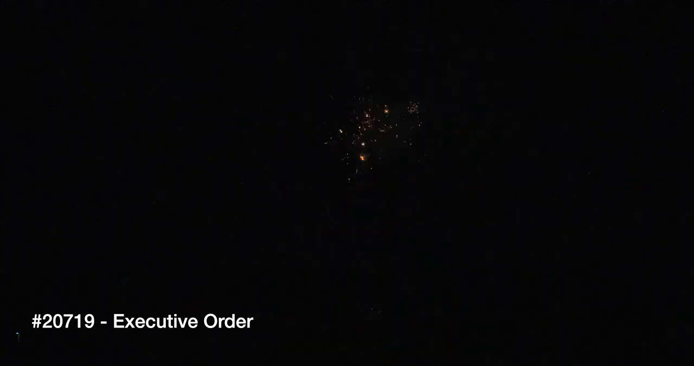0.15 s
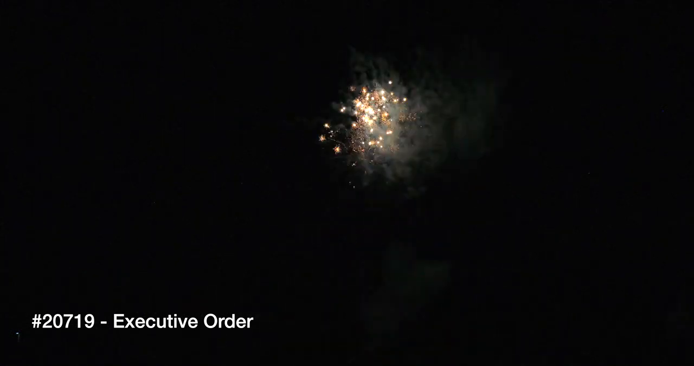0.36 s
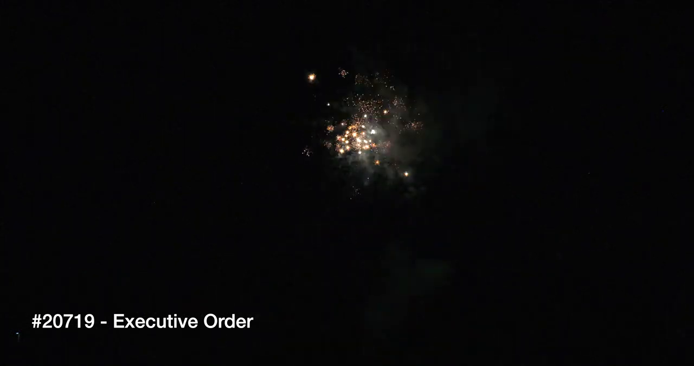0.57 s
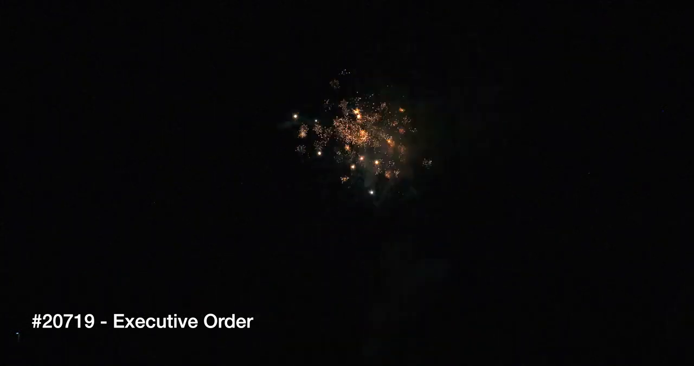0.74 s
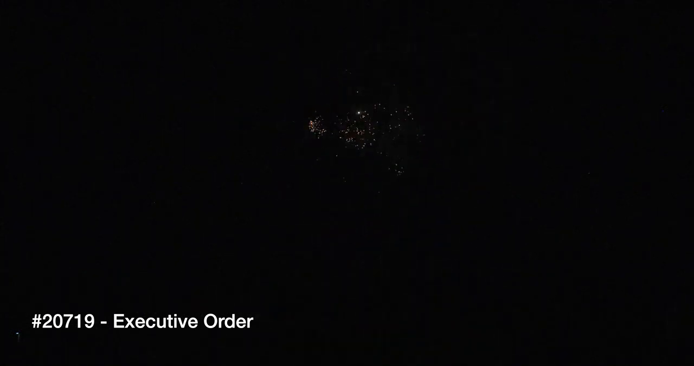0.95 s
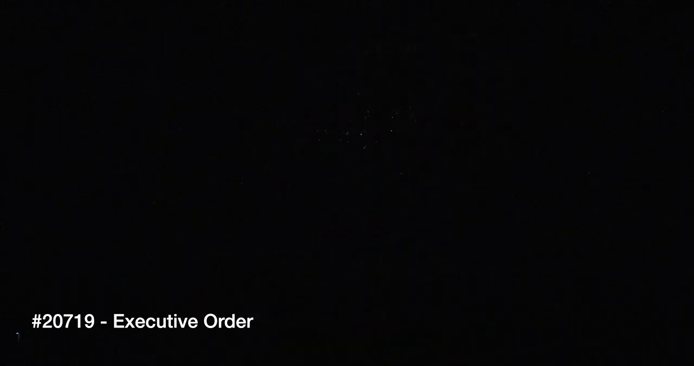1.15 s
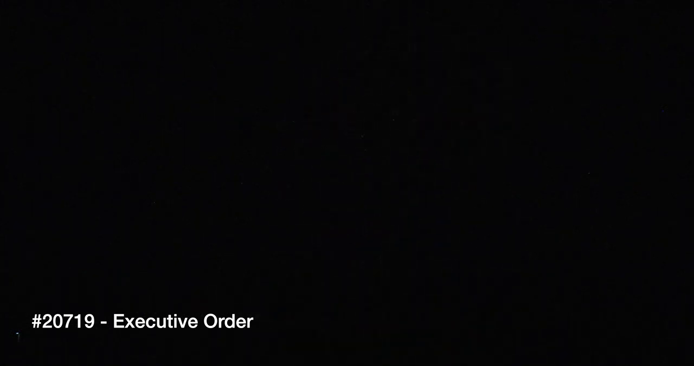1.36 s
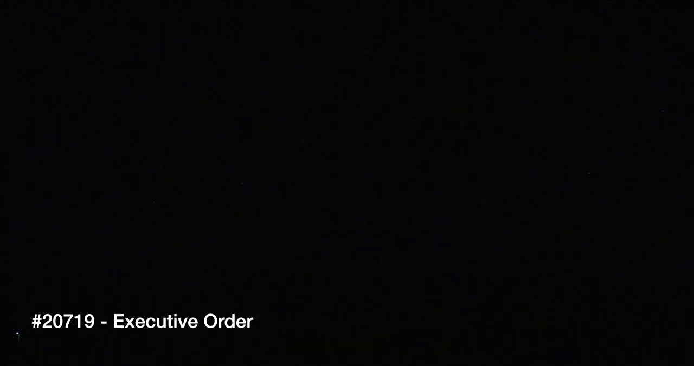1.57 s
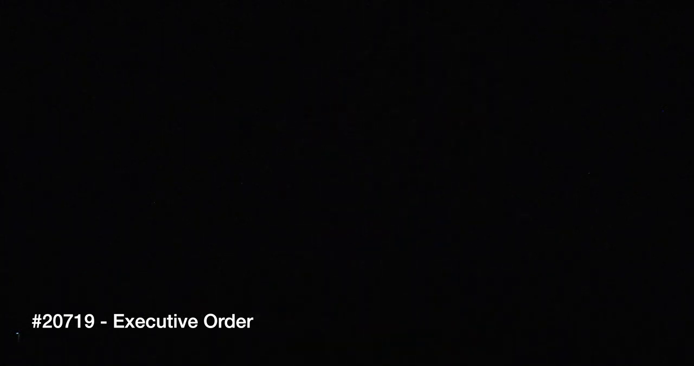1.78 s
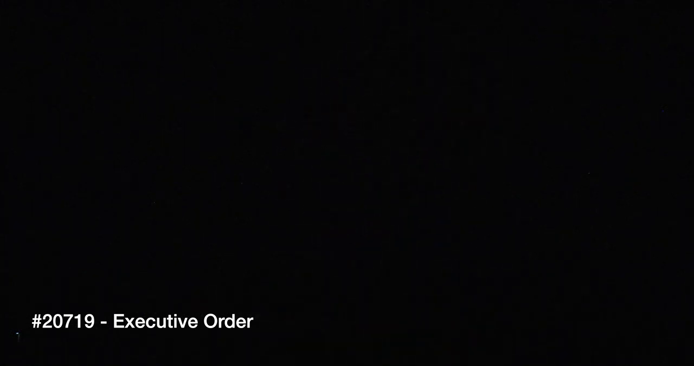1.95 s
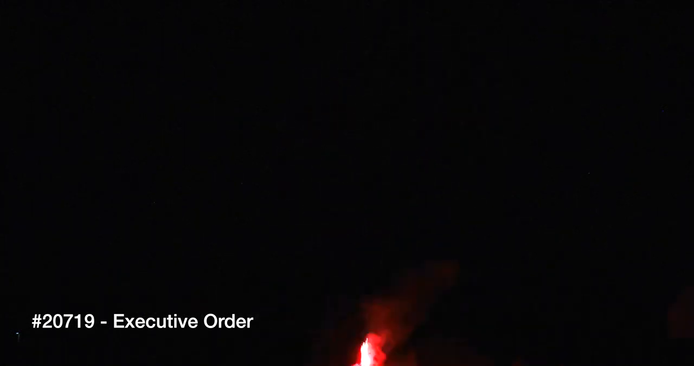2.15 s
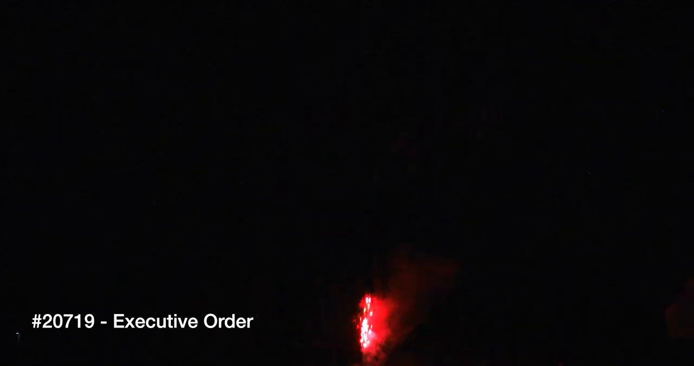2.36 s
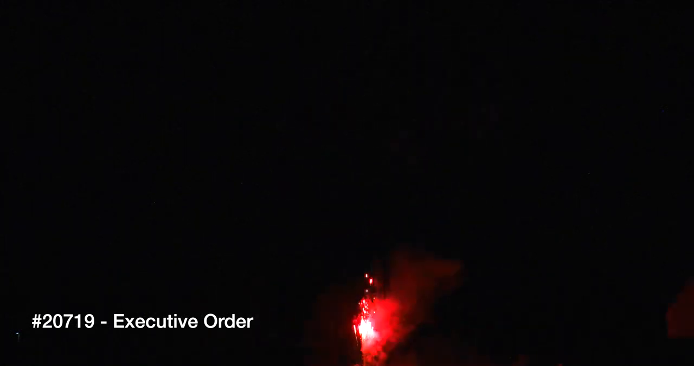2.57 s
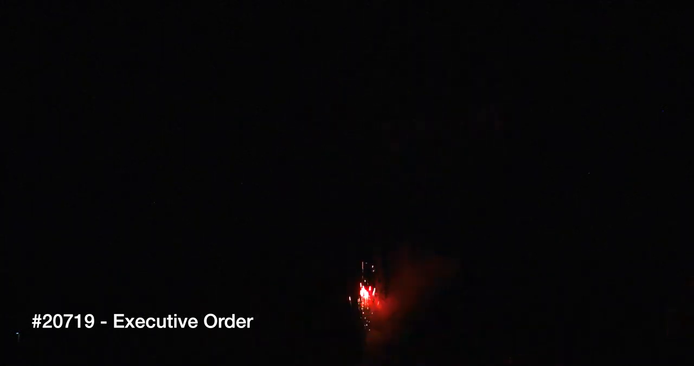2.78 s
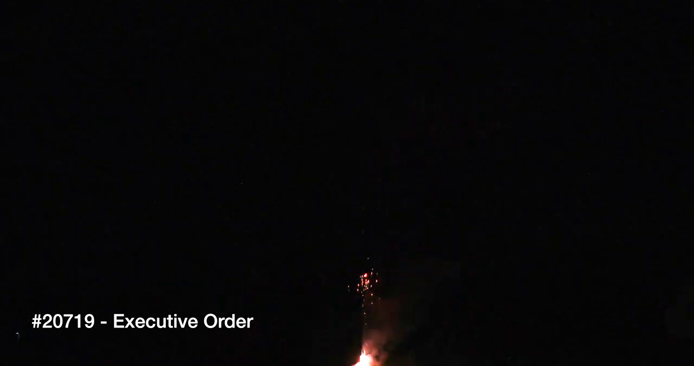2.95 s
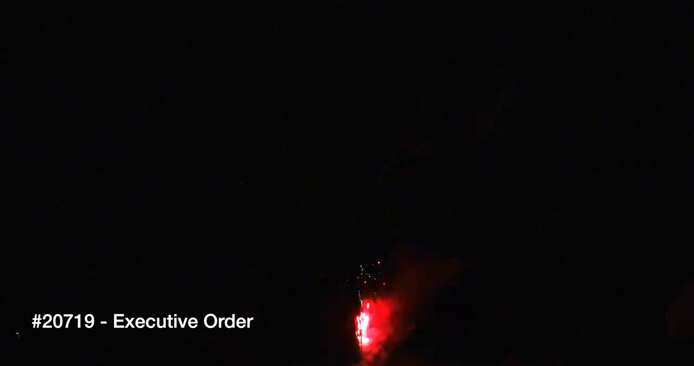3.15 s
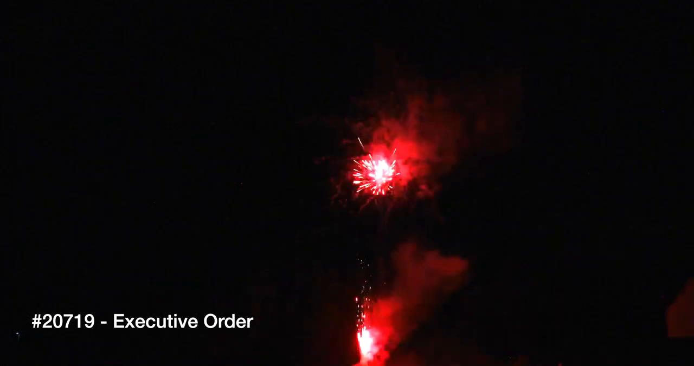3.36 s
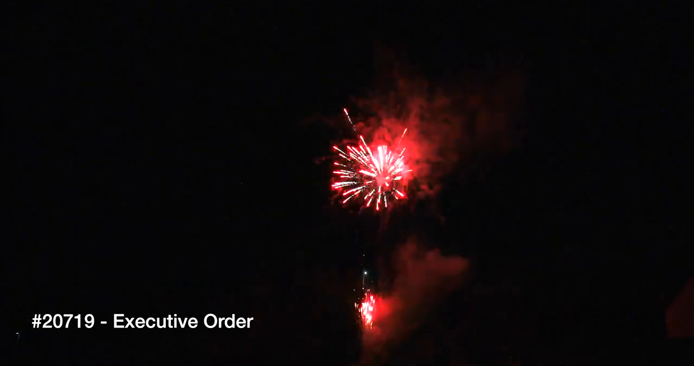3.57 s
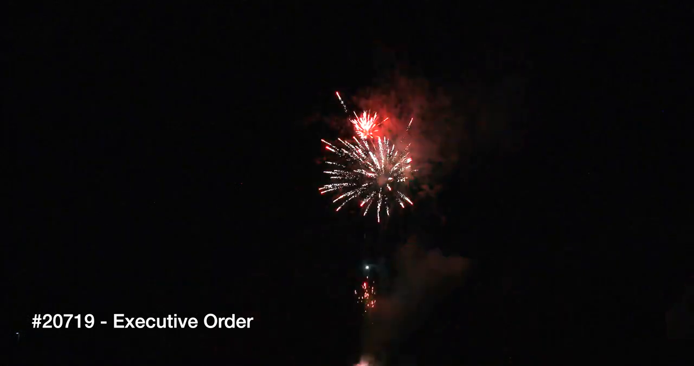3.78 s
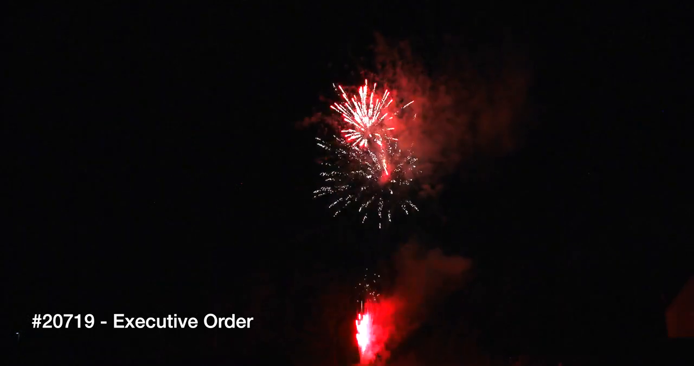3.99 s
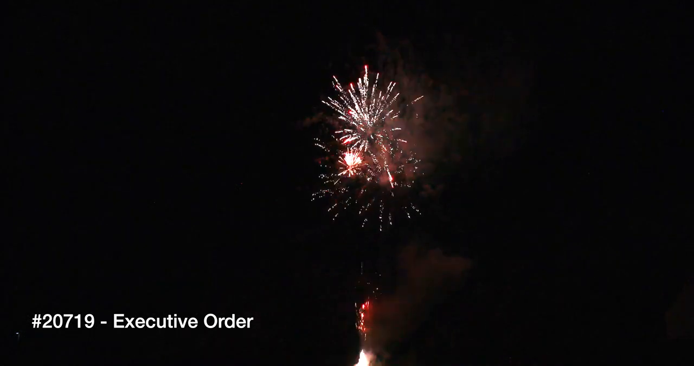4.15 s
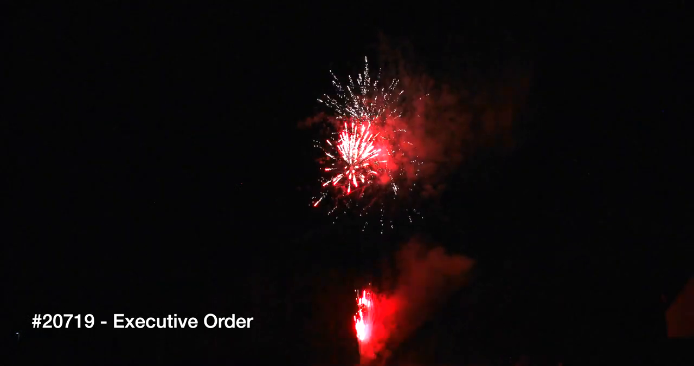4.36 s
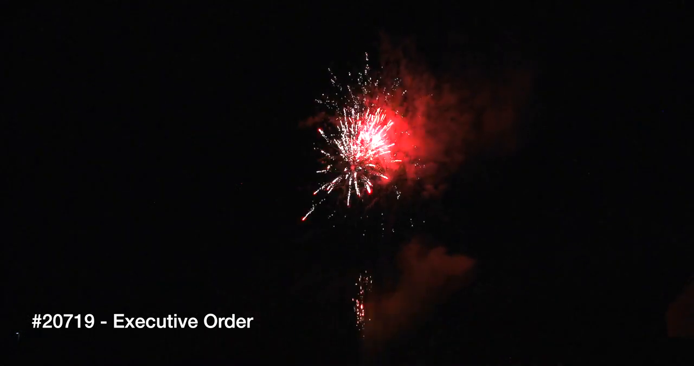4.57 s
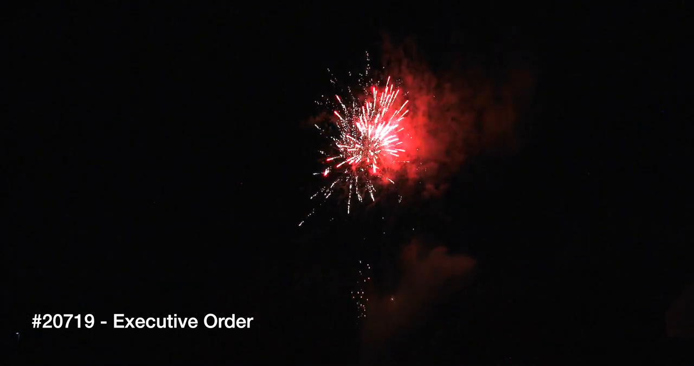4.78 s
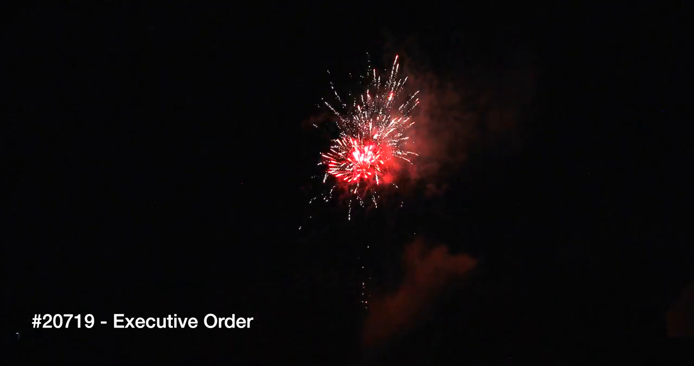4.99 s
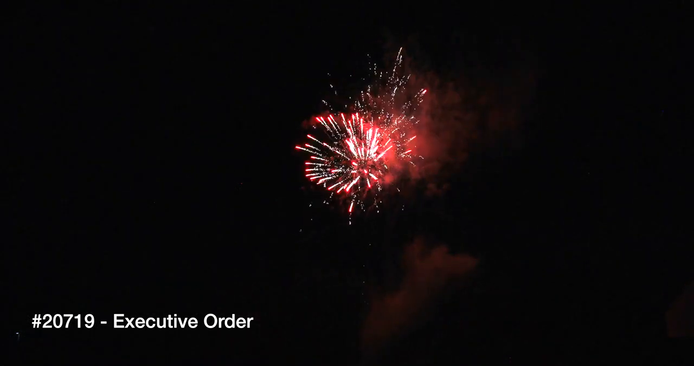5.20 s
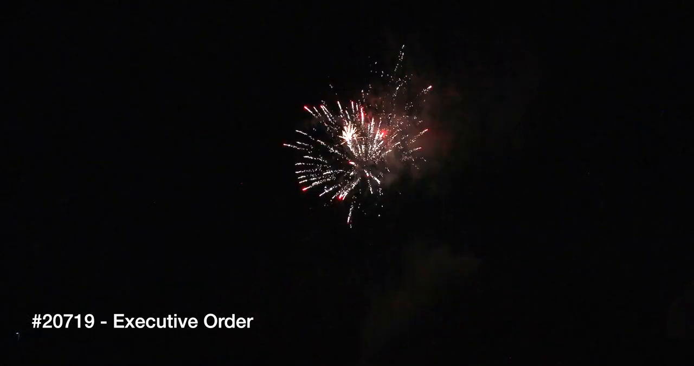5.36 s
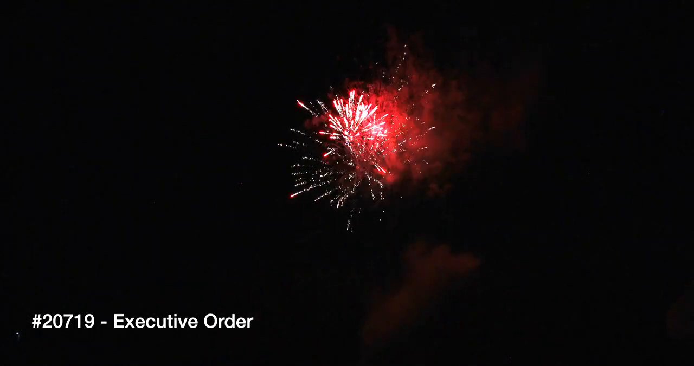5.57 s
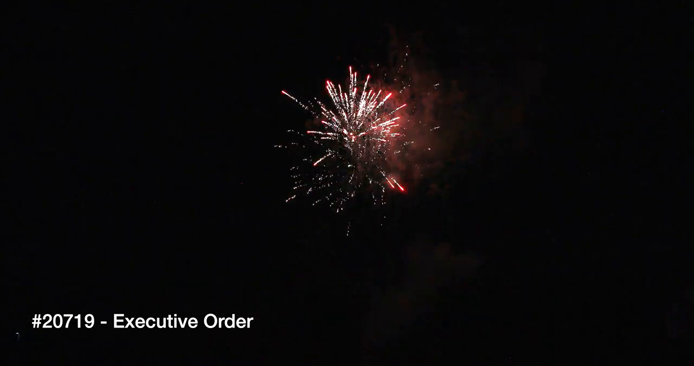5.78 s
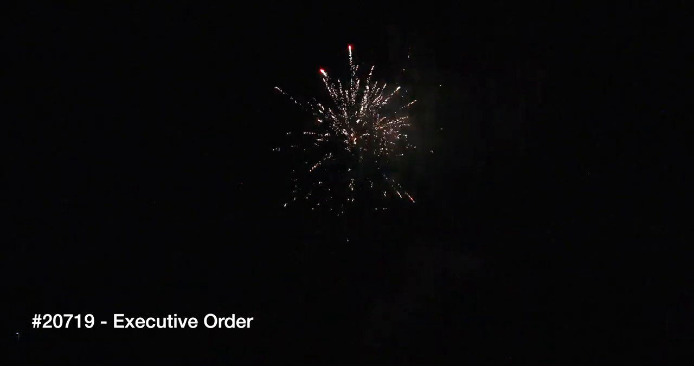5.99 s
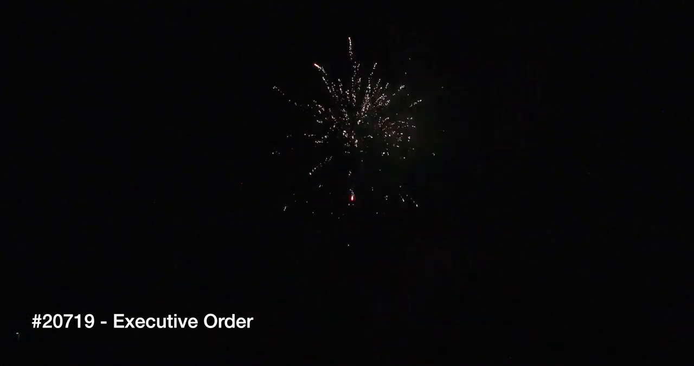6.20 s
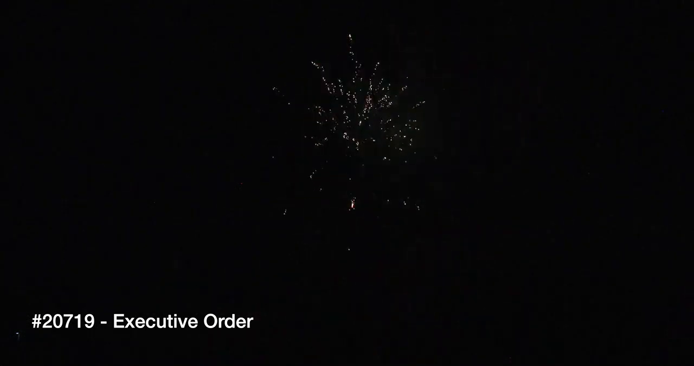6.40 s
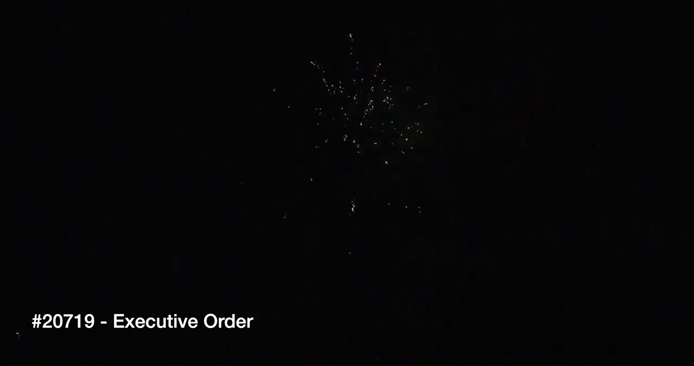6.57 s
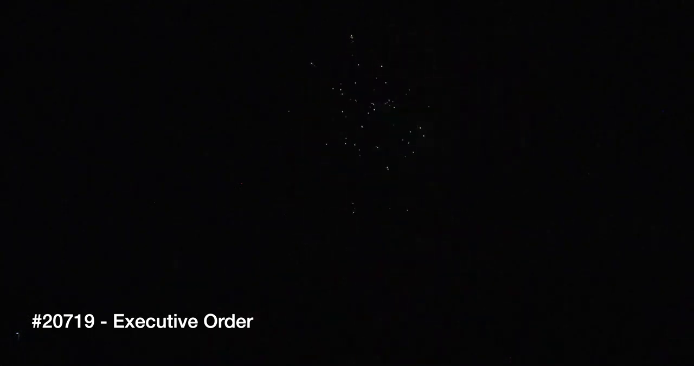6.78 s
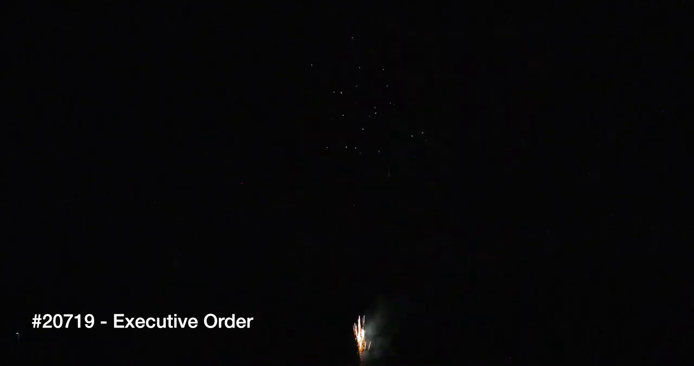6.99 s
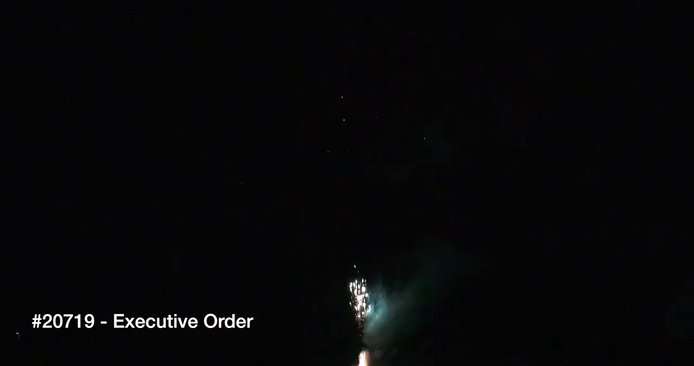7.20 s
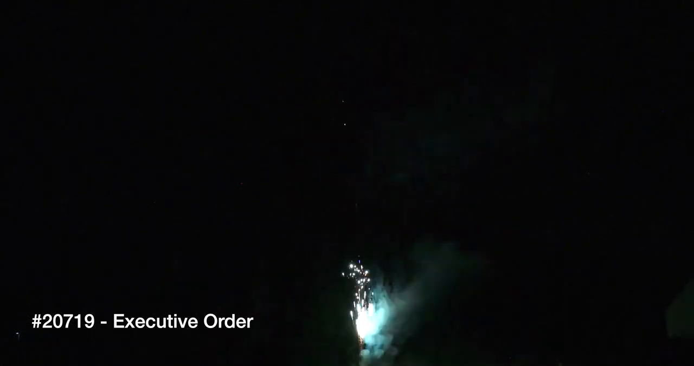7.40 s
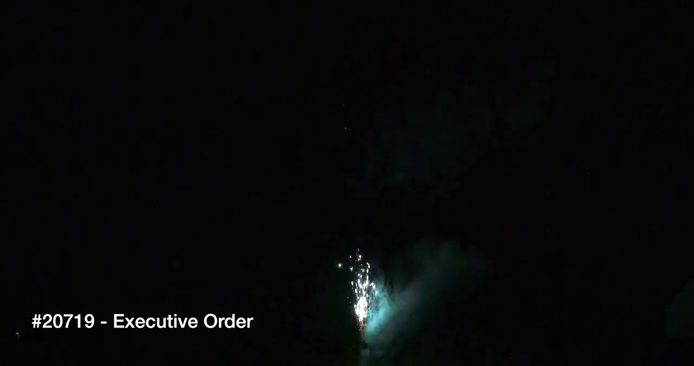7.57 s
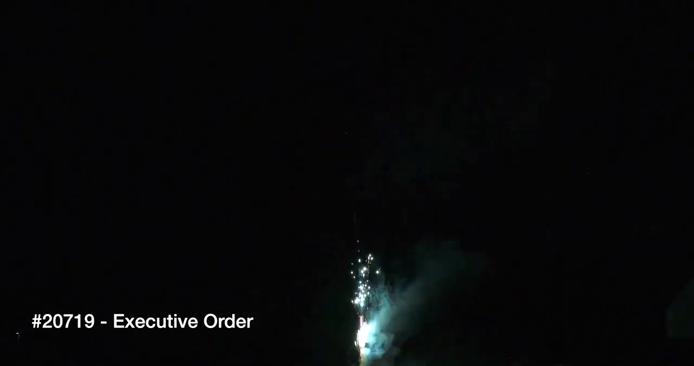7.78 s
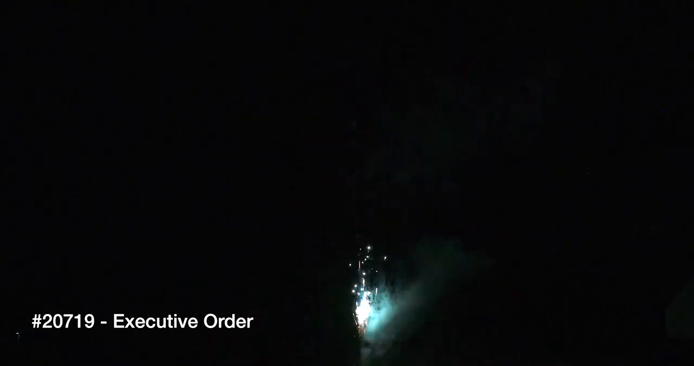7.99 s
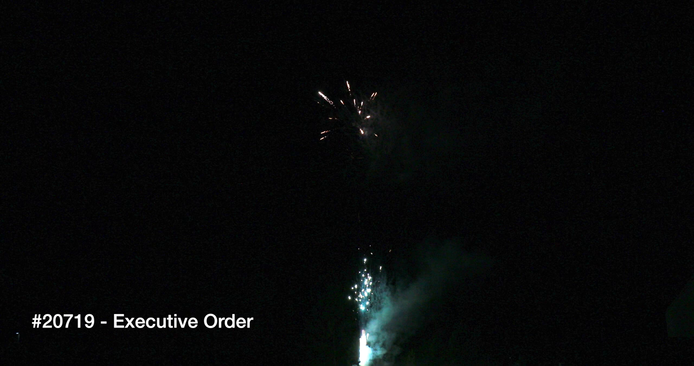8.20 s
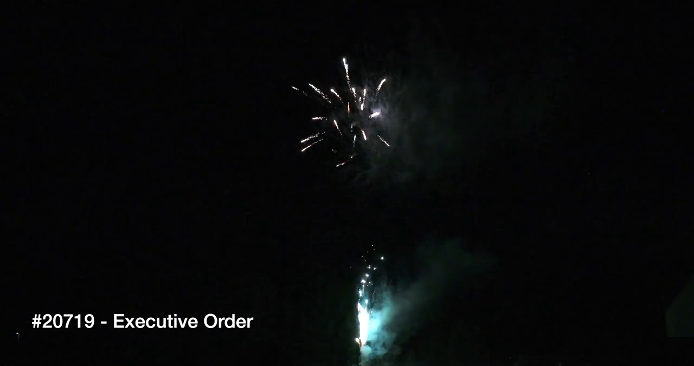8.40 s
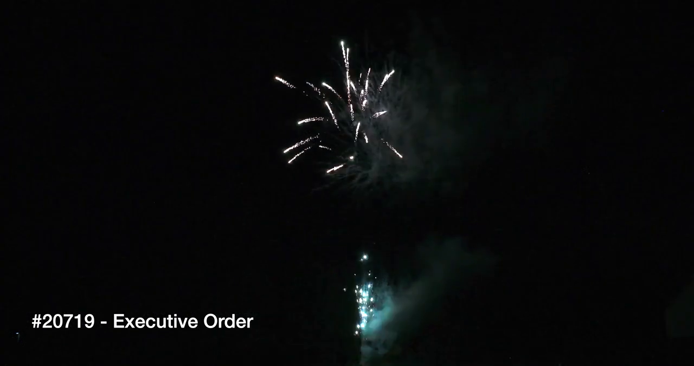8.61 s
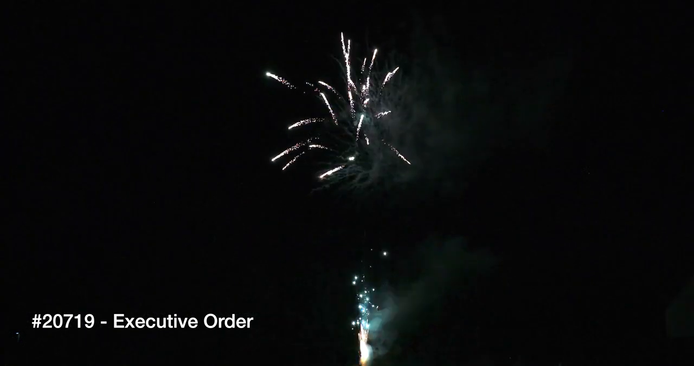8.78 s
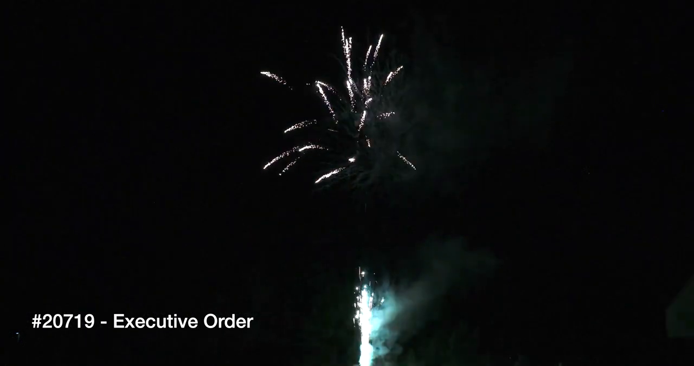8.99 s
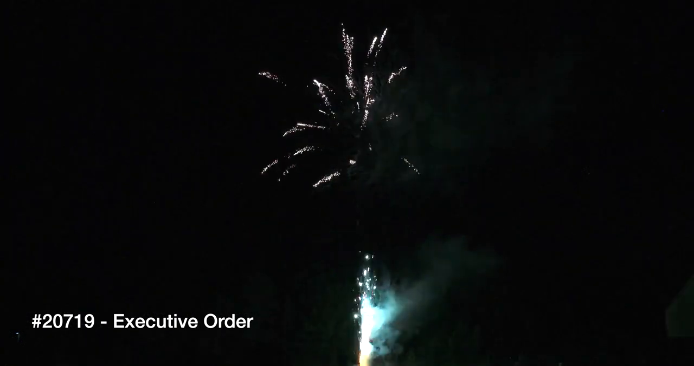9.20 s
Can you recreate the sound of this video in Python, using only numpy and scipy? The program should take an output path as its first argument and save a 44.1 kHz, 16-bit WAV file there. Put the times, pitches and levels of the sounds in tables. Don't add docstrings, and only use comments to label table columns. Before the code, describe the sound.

Fireworks at night: crackling stars fade to a distant rumble, then two volleys of thudding tube launches and hard overloaded bangs with rolling echoes.

```python
import sys
import numpy as np
from scipy import signal
from scipy.fft import rfft, irfft, next_fast_len
from scipy.io import wavfile
from scipy.ndimage import uniform_filter1d

SR = 44100
rng = np.random.default_rng(int(sys.argv[2]) if len(sys.argv) > 2 else 0)


def voltage_ratio(decibels):
    exponent = np.asarray(decibels, float) / 20
    return 10 ** exponent


def int16_out(signal):
    q = np.round(np.clip(np.atleast_2d(signal).T, -1, 1) * 32767)
    wavfile.write(sys.argv[1], SR, q.astype(np.int16))


N = 407925


def in_time(rows):
    s, *columns = np.transpose(rows)
    return [np.interp(np.arange(N) / SR, s, c) for c in columns]


def at_hz(points, hz):
    point_hz, value = np.transpose(points)
    return np.interp(np.log(hz), np.log(point_hz), value)


def strikes(s, left_db, right_db):
    out = np.zeros((2, N))
    at = np.round(np.asarray(s) * SR).astype(int)
    inside = at < N
    for side, db in zip(out, (left_db, right_db)):
        np.add.at(side, at[inside], (voltage_ratio(db) + 0 * at)[inside])
    return out + 1e-18


def ring(clicks, hz, t60, sudden=False):
    r = voltage_ratio(-60 / (t60 * SR))
    w = 2 * np.pi * hz / SR
    top = [1, -r * np.cos(w)] if sudden else [0, np.sin(w)]
    return signal.lfilter(top, [1, -2 * r * np.cos(w), r * r], clicks)


def passed(x, kind, hz, order=2):
    return signal.sosfilt(signal.butter(order, hz, kind, fs=SR, output="sos"), x)


def drift(points, count):
    knots = uniform_filter1d(rng.standard_normal(2 * points + 2), size=2) * np.sqrt(2)
    return np.interp(np.linspace(0, 2 * points, count), np.arange(len(knots)), knots)


# (frequency [Hz], level [dB], t60 [s])
BLAST_MODES = [
    (950, 7, .005),
    (370, 0.5, .0075),
    (75, -28, .04),
]


def blast(clicks):
    fast, slow, deep = [voltage_ratio(db) * ring(clicks, hz, t60) for hz, db, t60 in BLAST_MODES]
    crack = voltage_ratio(-3) * ring(clicks, 3500, .0015, sudden=True)
    return slow - fast - deep - crack


# (time [s], peak [dB], ground echo [ms], wall echo [ms])
BURSTS = [(0.2976, 8.5, 3.9, 12), (0.5496, 7, 3.54, 11.47), (3.6002, 14, 3.16, 11.13), (4.0616, 13, 4, 11),
          (4.4752, 10.5, 3.36, 12.4), (4.8181, 12.5, 3.7, 11.29), (5.2392, 12.5, 3.47, 11.95),
          (5.723, 12.5, 3.79, 12.2), (8.345, 13.5, 3.9, 11.68), (8.559, 11.5, 3.6, 12.15),
          (9.2429, 10, 3.8, 12.1)]


def bursts():
    s, db, ground_ms, wall_ms = np.transpose(BURSTS)
    clicks = strikes(s, db, db)
    clicks += strikes(s + ground_ms / 1000, db - 7.5, db - 6.5)
    clicks += strikes(s + wall_ms / 1000, db - 11.5, db - 4.0)
    clicks += strikes(s + (wall_ms + .9 * ground_ms) / 1000, db - 14, db - 7)
    clicks += strikes(s + .0805, db - 27, db - 27)
    return blast(clicks)


# (time [s], thump [dB], muzzle hiss [dB])
LIFTS = [
    (2.4608, 7.5, -5.5),
    (2.7975, 8, -8.5),
    (3.2585, 8, -8),
    (4.1422, -4, -14),
    (7.2231, 8, -3.5),
    (7.5497, 9, -5.5),
    (8.003, 8.5, -8),
    (8.4424, -6.5, -17.5),
    (9.0329, 11, -5),
    (9.2111, 6.5, -8),
]
# (time [s], thump [dB], muzzle hiss [dB])
DUCKED_LIFTS = [
    (4.5183, -11, -34),
]
# (delay [ms], left [dB], right [dB])
LIFT_ECHOES = [(12.02, -9, -3), (31, -20, -19), (46.1, -18, -21), (56.7, -25, -39)]


def lifts():
    s, thump_db, hiss_db = np.transpose(LIFTS + DUCKED_LIFTS)
    arrivals = [(0, 0, 0)] + LIFT_ECHOES
    early = arrivals[:2]
    jumps = sum(strikes(s + ms / 1000, thump_db + left, thump_db + right) for ms, left, right in arrivals)
    thump = -passed(ring(jumps, 186, .033, sudden=True), "low", 1200)
    thump += voltage_ratio(-9.5) * ring(jumps, 89, .035)
    lead = sum(strikes(s + (ms - 4.5) / 1000, thump_db + left, thump_db + right) for ms, left, right in early)
    thump += voltage_ratio(-15) * ring(lead, 115, .03)
    gas = sum(strikes(s + (ms - 4.0) / 1000, hiss_db + .7 * left, hiss_db + .51 * right)
              for ms, left, right in early)
    swell = signal.lfilter(np.linspace(.4, 1.1, round(.005 * SR)) ** 3, [1], gas)
    after = voltage_ratio(-4.5) * signal.lfilter([1], [1, -voltage_ratio(-60 / (.09 * SR))], gas)
    noise = rng.standard_normal(N) + .52 * rng.standard_normal((2, N))
    hiss = passed(passed(noise, "low", 4700), "high", 1050)
    return thump + (swell + after) * hiss


# (time [s], peak [dB])
POPS = [
    (1.1722, -4),
    (1.1835, -8),
    (1.2003, -8),
    (1.2050, -3),
    (1.2545, -11),
    (1.2618, -2),
]


def pops():
    s, db = np.transpose(POPS)
    clicks = strikes(s, db + .6, db - 1.5)
    clicks += strikes(s + .0037, db - 6, db - 7)
    clicks += strikes(s + .0099, db - 7, db - 4)
    return -ring(clicks, 1400, .003, sudden=True)


BRIGHT_SHARE = [-.3, 0.017, 0.94, 0.81]


def returns(t, s, rows, first_s, strength):
    peak_s, db, rise, fall = np.transpose(rows)[:, :, None, None]
    late = t - np.asarray(s)[:, None]
    level_db, bright_db = np.transpose(strength)[:, :, None]
    db = db + level_db + np.reshape(BRIGHT_SHARE, (4, 1, 1)) * bright_db
    db = db - rise * np.clip(peak_s - late, 0, 1) - fall * np.maximum(late - peak_s, 0)
    return np.sum(voltage_ratio(2 * db) * (late > first_s), axis=1)


def ducking(t, s, depth_db, corners):
    shape = np.interp(t - np.asarray(s)[:, None], np.sort([0, *corners]), [0, 1, 1, 0])
    return np.max(shape * np.abs(depth_db)[:, None], axis=0)


# (peak after bang [s], peak [dB], rise [dB/s], fall [dB/s])
BURST_NEAR = [(.029, -25.3, 5, 40), (.166, -12, 5.4, 25), (.14, -13.2, 52, 42), (.12, -23, 102, 62)]
BURST_FAR = [(.556, -35, 11.6, 4.8), (.54, -15.6, 14, 9), (.564, -26.3, 9, 14), (.55, -46.5, 8.5, 24)]
LIFT_NEAR = [(.025, -8, 100, 420), (.037, -24, 58, 100), (.023, -14, 100, 380), (.024, -27, 100, 280)]
LIFT_TREES = [(.068, -25, 30, 50), (.153, -27.4, 98, 45), (.08, -16, 90, 180), (.072, -23.5, 200, 110)]
LIFT_FAR = [(.168, -28, 45, 23), (.153, -20.5, 148, 24), (.18, -17, 82, 52), (.18, -31, 74, 68)]
# (level [dB], brightness [dB])
BURST_ROAR = [(-10, -.6), (-18.5, -2), (1.3, -.5), (-1.5, 3.3), (-.3, 2.6), (-2.8, 2), (-1.4, .9),
              (-.5, -.6), (-.7, -.2), (-.8, .6), (.1, .1)]
# (level [dB], brightness [dB])
LIFT_ROAR = [(-1.2, -1.2), (-2.3, -2.5), (-1.8, -.6), (-3, 2.5), (1.7, .6), (.3, -.2), (-1, -.5), (-6, 2.5),
             (.7, -1), (.1, .1)]
# (time [s], length [s], level [dB], fall [dB/s])
CLOUDS = [
    (.013, .044, -17, 115),
    (.225, .068, -13.2, 415),
    (.385, .035, -23, 76),
    (.749, .094, -14.7, 88),
    (1.005, .095, -15, 89),
    (1.186, .023, -23.3, 378),
    (1.268, .005, -28.5, 365),
]
CLOUD_TILT_DB = [-15.4, -.9, .8, -8.8]
# (start level [dB], slope [dB/s])
LULL = [(-53, 14.5), (-33, 6), (-32.5, -4.5), (-40, -34)]
# (full after [s], held till [s], released at [s])
BURST_DUCK = (.057, .077, .189)
# (full after [s], held till [s], released at [s])
LIFT_DUCK = (.021, .045, .064)
BURST_DUCK_DB = [1.5, 1.7, 15.5, 16, 14, 15.6, 15, 17, 14, 15, 14]
LIFT_DUCK_DB = [7.5, 6, 7.3, .5, 8.9, 7.5, 8.3, .5, 6.9, 6]


def roar_levels():
    t = np.arange(0, N + 64, 64) / SR
    burst_s, lift_s = np.transpose(BURSTS)[0], np.transpose(LIFTS)[0]
    trees_first_s, lull_s, cloud_rise_db_per_s = .061, 1.28, 128
    power = returns(t, burst_s, BURST_NEAR, .011, BURST_ROAR)
    power += returns(t, burst_s, BURST_FAR, .1, BURST_ROAR)
    power += returns(t, lift_s, LIFT_NEAR, .02, LIFT_ROAR)
    power += returns(t, lift_s, LIFT_TREES, trees_first_s, LIFT_ROAR)
    power += returns(t, lift_s, LIFT_FAR, trees_first_s, LIFT_ROAR)

    s, lasts, db, fall = np.transpose(CLOUDS)[:, :, None]
    clouds_db = db - cloud_rise_db_per_s * np.maximum(s - t, 0) - fall * np.maximum(t - s - lasts, 0)
    power += voltage_ratio(2 * np.array(CLOUD_TILT_DB))[:, None] * voltage_ratio(2 * clouds_db).sum(0)

    start_db, slope = np.transpose(LULL)[:, :, None]
    in_lull = (t > lull_s) * (t < lift_s[0] + trees_first_s)
    power += voltage_ratio(2 * (start_db + slope * (t - lull_s))) * in_lull

    burst_lost_db = ducking(t, burst_s, BURST_DUCK_DB, BURST_DUCK)
    lift_lost_db = ducking(t, lift_s, LIFT_DUCK_DB, LIFT_DUCK)
    lost_db = np.maximum(burst_lost_db, lift_lost_db)
    return [np.interp(np.arange(N) / SR, t, 10 * np.log10(p + 1e-12) - lost_db) for p in power]


# (time [s], rate [1/s], size spread [dB])
SHOCKS = [(0, 3200, 3.2), (1.1, 3200, 3.2), (1.22, 2500, 3.6), (1.3, 4000, 2.8), (1.35, 9000, 2.5),
          (9.25, 9000, 2.5)]


def small_shocks():
    per_s, spread_db = in_time(SHOCKS)
    clump_db = 1.16 * drift(points=round(25 * N / SR), count=N)
    sizes = voltage_ratio(spread_db * np.minimum(rng.exponential(1, (2, N)), 4) + clump_db)
    struck = rng.random((2, N)) < per_s / SR
    return -sizes * struck / np.sqrt(per_s / SR) / voltage_ratio(1.6 * spread_db)


# (low [Hz], high [Hz])
ROAR_BANDS = [(90, 300), (450, 1300), (1800, 4000), (6000, 11000)]
# (frequency [Hz], correlation [-1..1])
LIKENESS = [(60, 1), (300, 0.8), (1000, 0.8), (3000, 0.72), (8000, 0.38), (15000, 0.66)]
# (frequency [Hz], density [dB/Hz])
CRACKLE = [(24, -58), (40, -29), (133, -17), (256, -6), (382, -10), (479, -5.5), (1240, -6), (1720, -12),
           (6820, -16), (16000, -37)]
FAR_ECHOES = [(24, -50), (40, -18), (87, -23.5), (180, -14), (231, -16.5), (297, -11), (646, -3.5),
              (1090, -7), (1480, -13), (1850, -16), (9220, -28), (16000, -75)]
RED_COMET = [(24, -47), (40, -27), (167, -4.5), (283, -11), (479, -7), (556, -12), (751, -7), (918, -12.5),
             (1090, -8), (1630, -4.5), (3060, -12), (6650, -24.5), (16000, -50.5)]
BURST_ECHOES = [(24, -56), (40, -32), (167, -11.5), (283, -13), (715, 0), (1150, -2.5), (1810, -12),
                (2050, -12), (4570, -18.5), (8770, -29.5), (16000, -52)]
GREEN_COMET = [(24, -43), (40, -15), (130, -2.5), (226, -4.5), (382, -7), (751, -2), (1020, -4), (1090, -1),
               (1590, -5.5), (2150, -1.5), (6820, -16), (9220, -23), (16000, -46)]
COLOURS = [CRACKLE, FAR_ECHOES, RED_COMET, BURST_ECHOES, GREEN_COMET]
# (start [s], index in COLOURS)
STAGES = [
    (0, 0),
    (1.33, 1),
    (2.46, 2),
    (3.6, 3),
    (6.55, 1),
    (7.22, 4),
    (8.345, 3),
    (9.03, 4),
]


def roar():
    size = next_fast_len(N)
    hz = np.maximum(np.arange(size // 2 + 1) * SR / size, 1)
    mid, side = rfft(small_shocks(), size) * np.exp(-1.05j)
    alike = np.clip(at_hz(LIKENESS, hz), -1, 1)
    pair = np.sqrt(1 + alike) * mid + np.sqrt(1 - alike) * side * [[1], [-1]]
    pair = pair * np.exp(-2j * np.pi * hz * [[0], [.3 / SR]])
    starts, places = np.transpose(STAGES)
    playing = places[np.searchsorted(starts, np.arange(N) / SR, "right") - 1]
    centres = np.log([np.sqrt(low * high) for low, high in ROAR_BANDS])
    gains = voltage_ratio(np.array(roar_levels()))
    out = np.zeros((2, N))
    for place, colour in enumerate(COLOURS):
        ripple_db = .8 * drift(points=round(SR / 250), count=len(hz))
        coloured = pair * voltage_ratio(at_hz(colour, hz) + ripple_db)
        on = uniform_filter1d(1. * (playing == place), size=800)
        power = np.abs(coloured.mean(0)) ** 2
        heard = np.flatnonzero(on > 1e-6)
        for k, gain in enumerate(on * gains):
            low, high = ROAR_BANDS[k]
            rms = np.sqrt(2 * np.sum(power[(hz > low) & (hz < high)])) / size
            share = np.interp(np.log(hz), centres, np.arange(4) == k)
            out[:, heard] += gain[heard] / rms * irfft(coloured * share, size)[:, heard]
    return out


# (time [s], level [dB])
HUM = [(6.3, -63.5), (6.5, -35.5), (7.1, -41.5), (7.22, -43)]
# (time [s], level [dB])
HISS = [(0, -73), (1.4, -59), (2.4, -45), (2.5, -46), (6.0, -50), (6.6, -46.5), (7.2, -44.5), (7.25, -50),
        (9.25, -57)]


def night():
    t = np.arange(N) / SR
    wobble = passed(rng.standard_normal(N), "low", 6.0) * 30
    hum_db = np.interp(t, *np.transpose(HUM), left=-120, right=-120) + 5.0
    hum = voltage_ratio(hum_db) * np.sin(2 * np.pi * 176 * t + wobble)
    hiss = voltage_ratio(in_time(HISS)[0]) * passed(rng.standard_normal((2, N)), "high", 6900)
    return hum + hiss


def scene():
    left_db = -1.04
    balanced_roar = roar() * voltage_ratio([[left_db / 2], [-left_db / 2]])
    left, right = bursts() + lifts() + pops() + balanced_roar + night()
    return np.array([left, np.append(0, right[:-1])])


def band_limit(x):
    return signal.sosfilt(signal.butter(12, 16250, fs=SR, output="sos"), x)


def record(dry):
    clipped = np.clip(passed(dry, "high", 50), -.98, .98)
    mix = passed(clipped, "low", 22000, order=1)
    return band_limit(mix)


dry = scene()
out = record(dry)
int16_out(out)
```